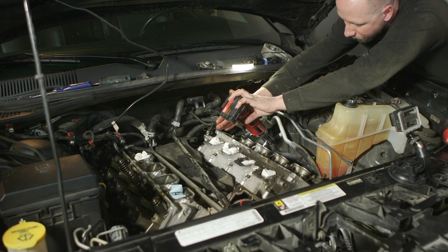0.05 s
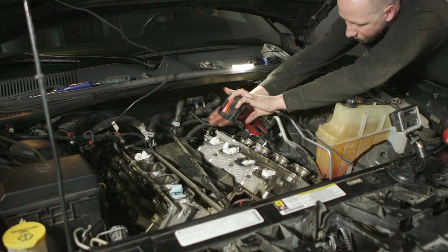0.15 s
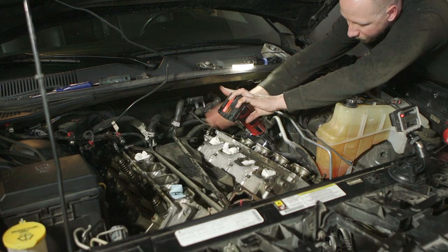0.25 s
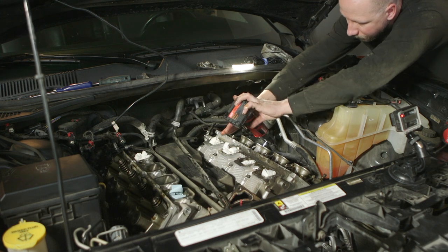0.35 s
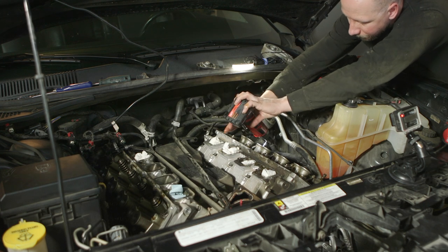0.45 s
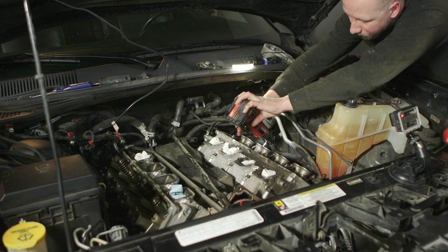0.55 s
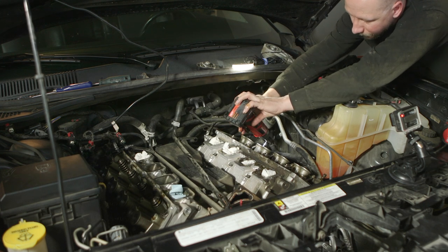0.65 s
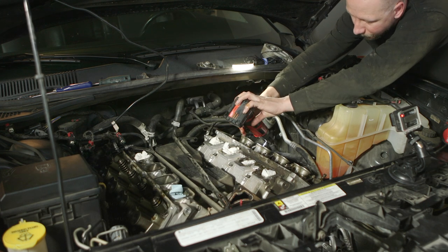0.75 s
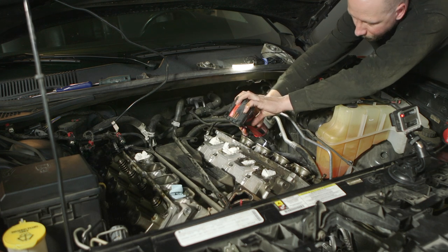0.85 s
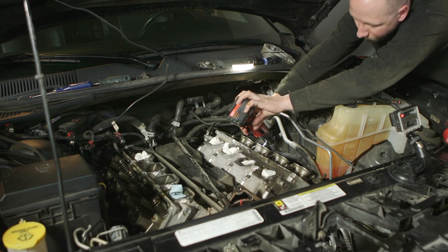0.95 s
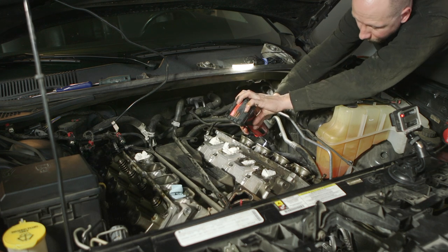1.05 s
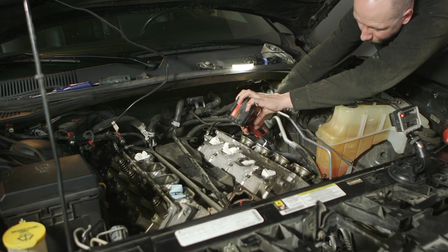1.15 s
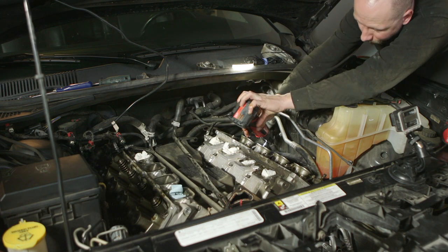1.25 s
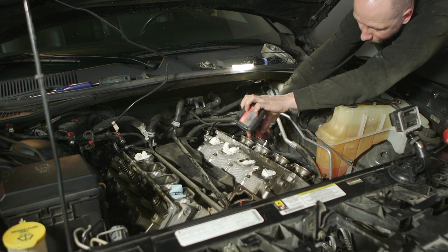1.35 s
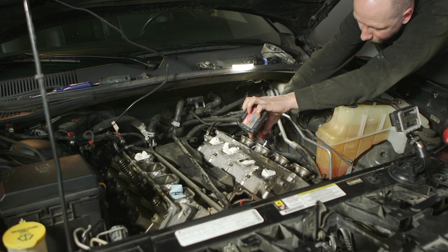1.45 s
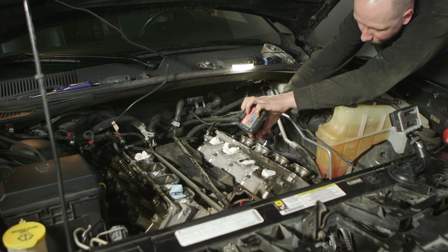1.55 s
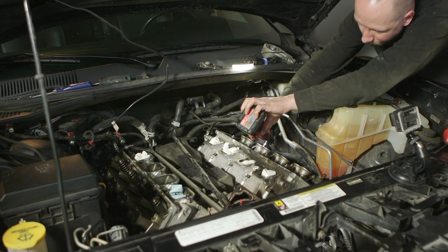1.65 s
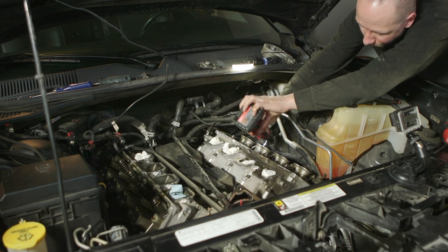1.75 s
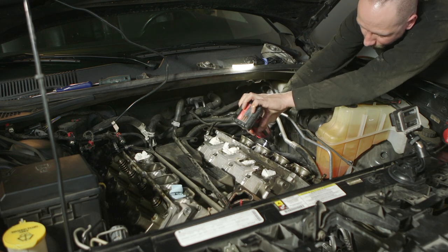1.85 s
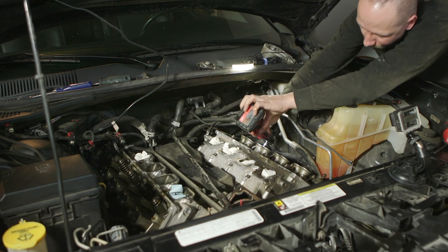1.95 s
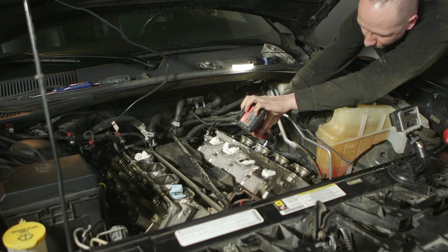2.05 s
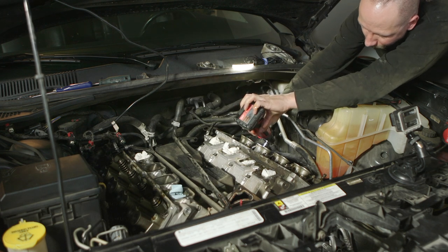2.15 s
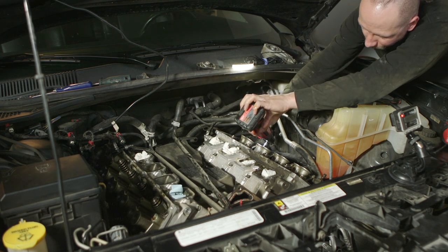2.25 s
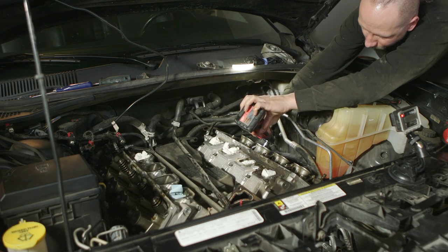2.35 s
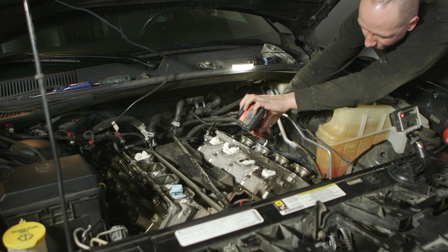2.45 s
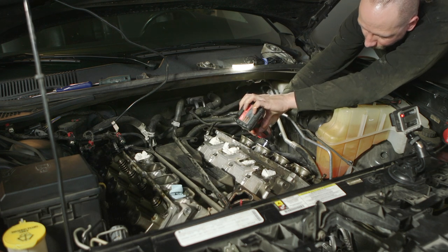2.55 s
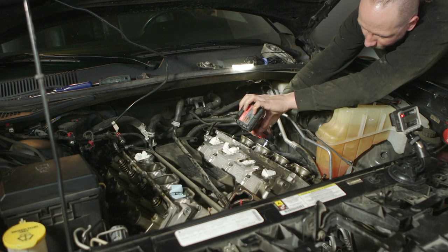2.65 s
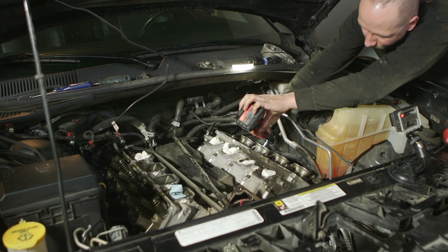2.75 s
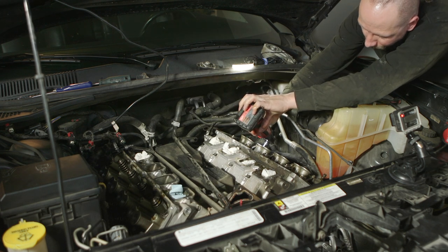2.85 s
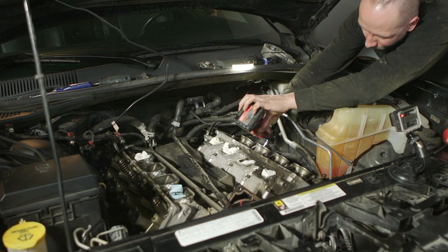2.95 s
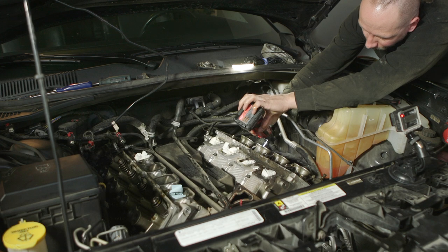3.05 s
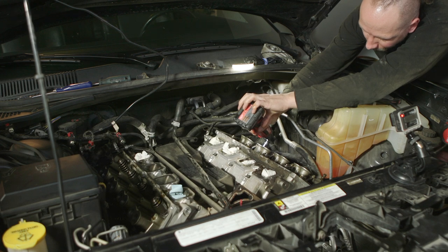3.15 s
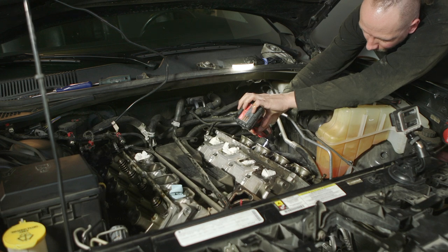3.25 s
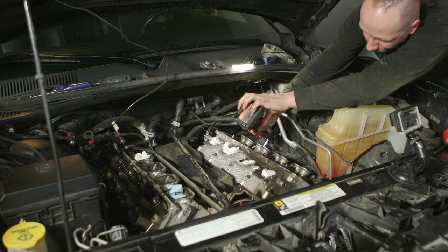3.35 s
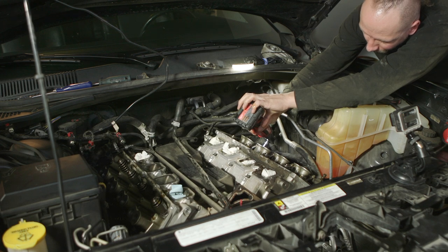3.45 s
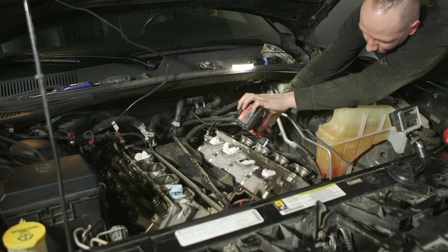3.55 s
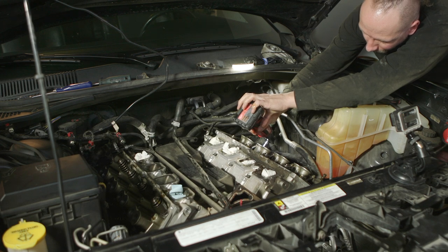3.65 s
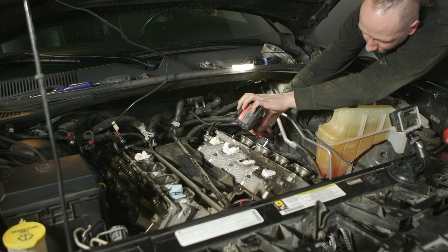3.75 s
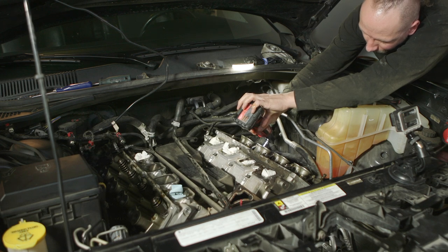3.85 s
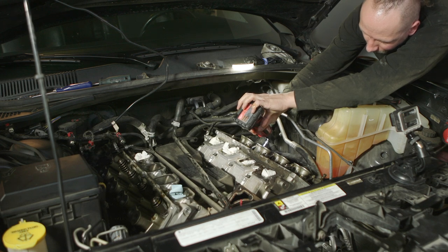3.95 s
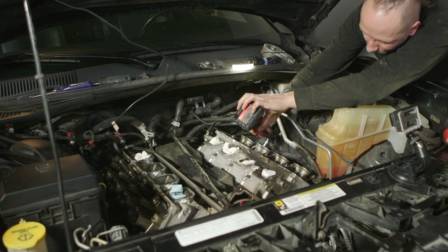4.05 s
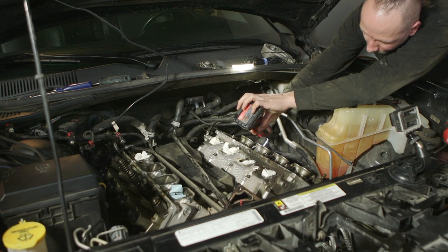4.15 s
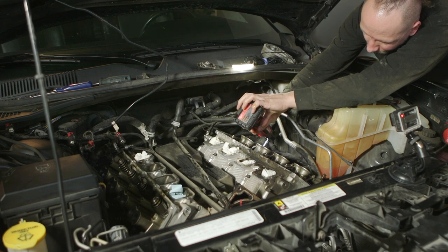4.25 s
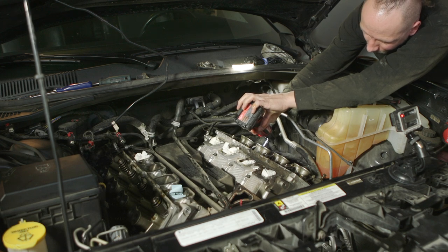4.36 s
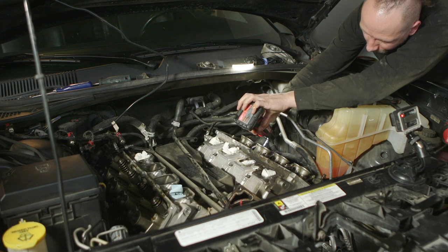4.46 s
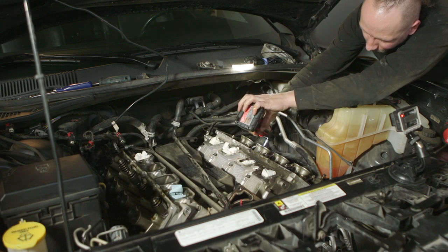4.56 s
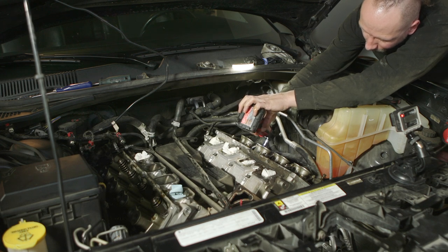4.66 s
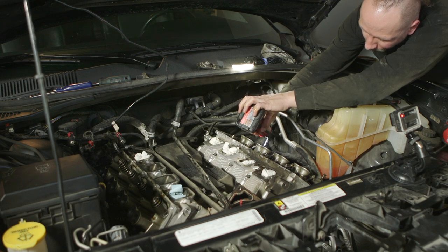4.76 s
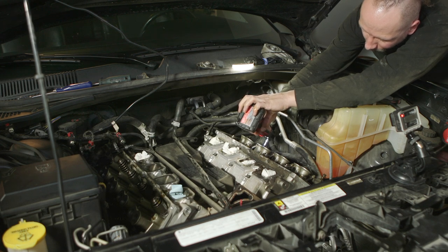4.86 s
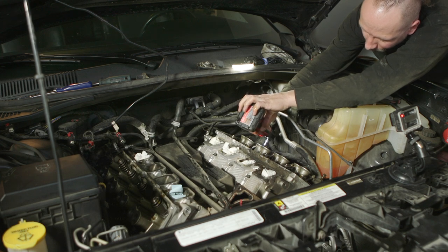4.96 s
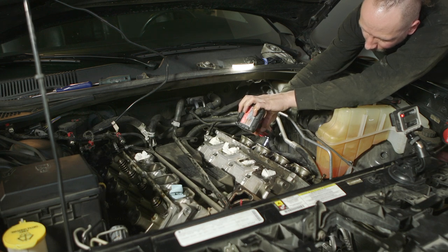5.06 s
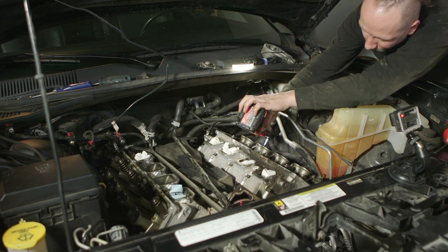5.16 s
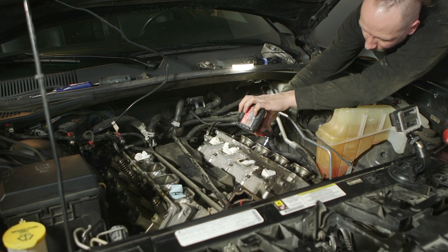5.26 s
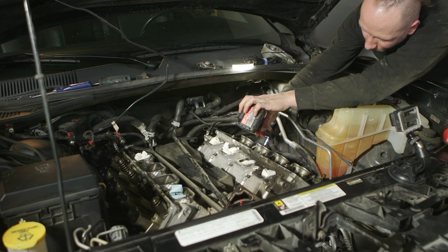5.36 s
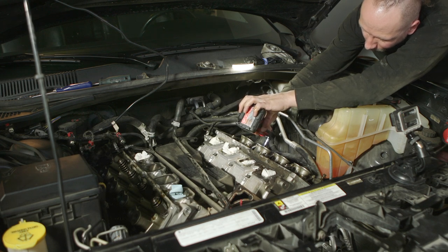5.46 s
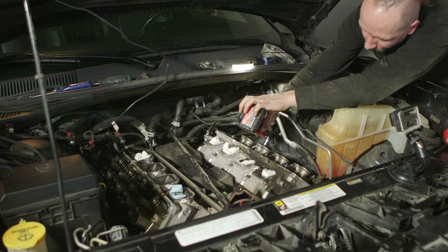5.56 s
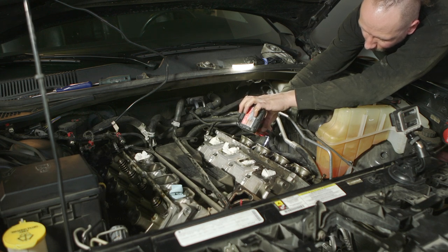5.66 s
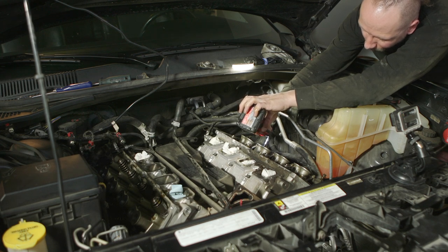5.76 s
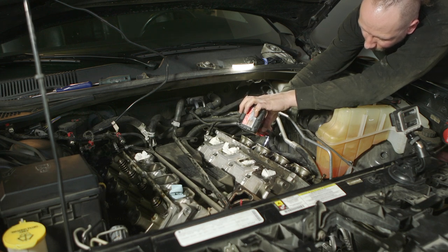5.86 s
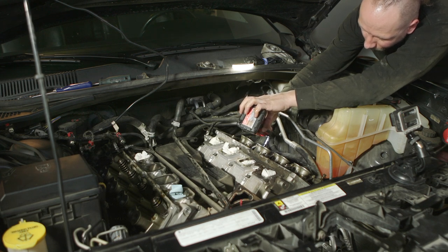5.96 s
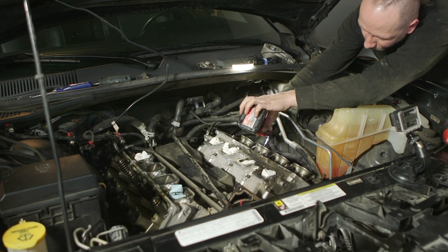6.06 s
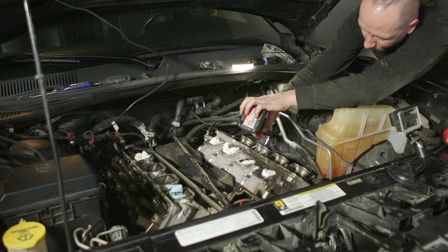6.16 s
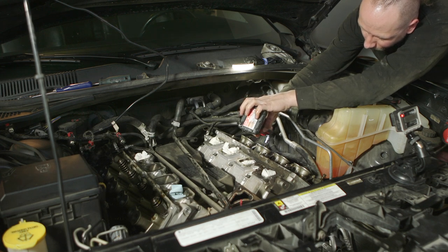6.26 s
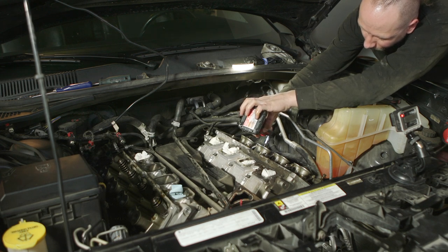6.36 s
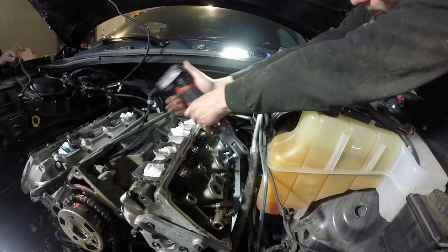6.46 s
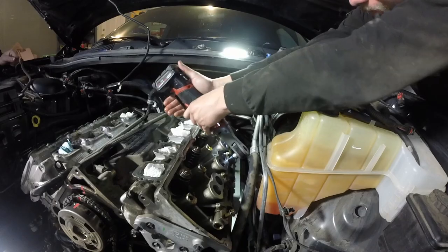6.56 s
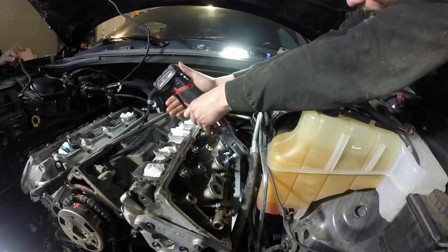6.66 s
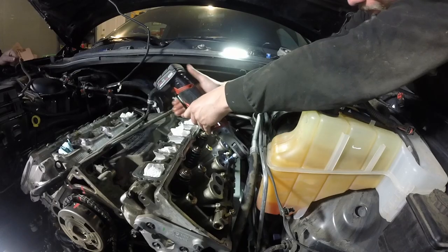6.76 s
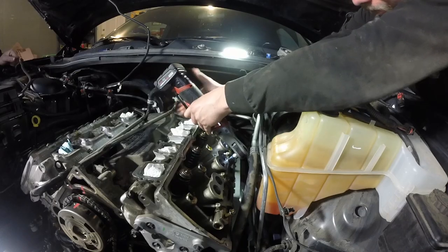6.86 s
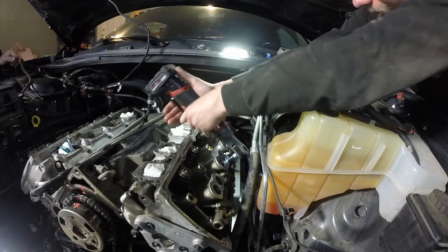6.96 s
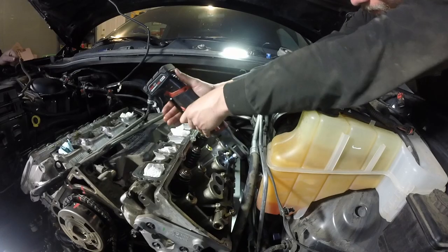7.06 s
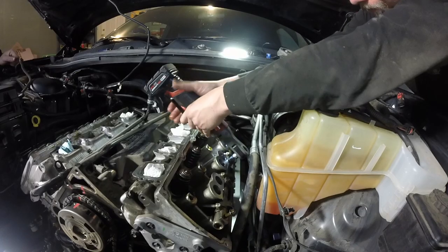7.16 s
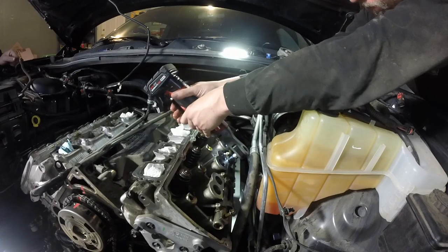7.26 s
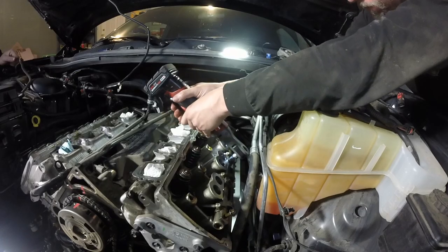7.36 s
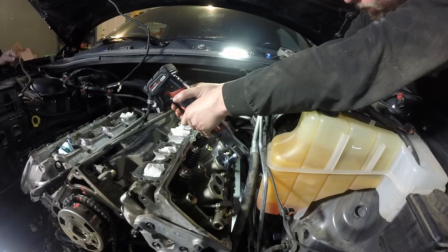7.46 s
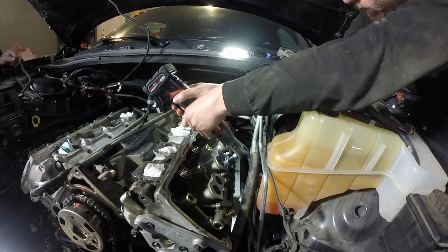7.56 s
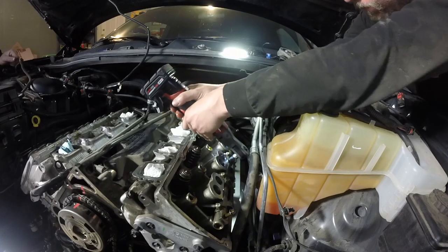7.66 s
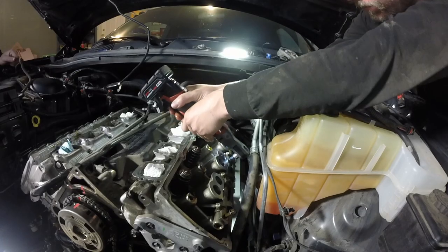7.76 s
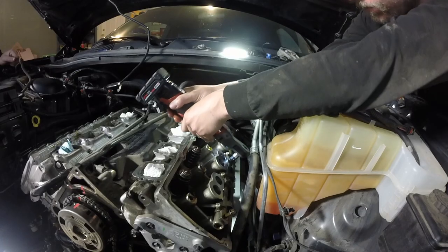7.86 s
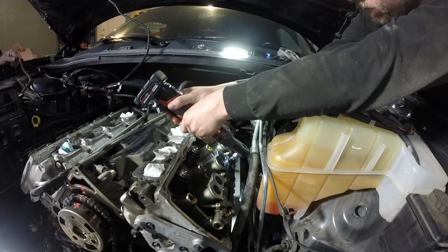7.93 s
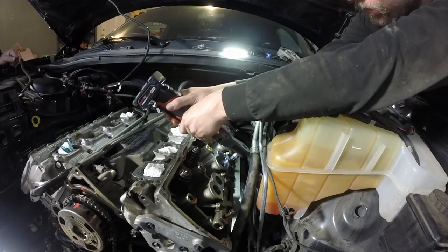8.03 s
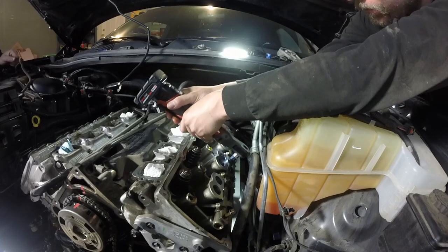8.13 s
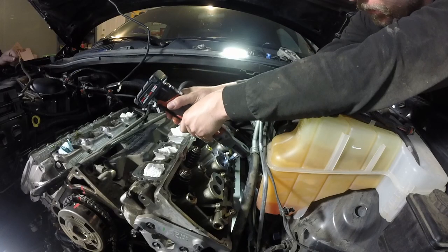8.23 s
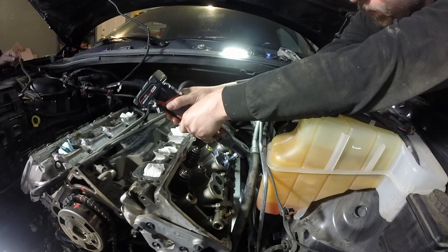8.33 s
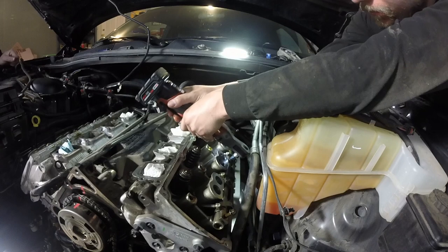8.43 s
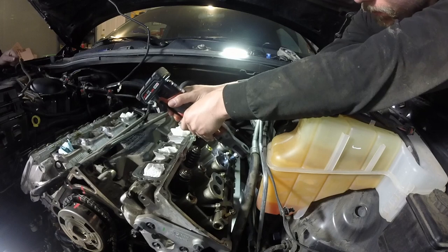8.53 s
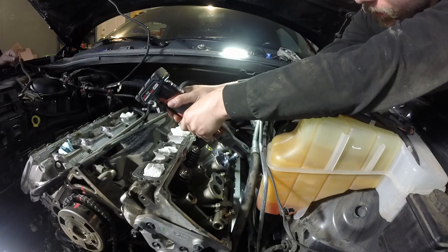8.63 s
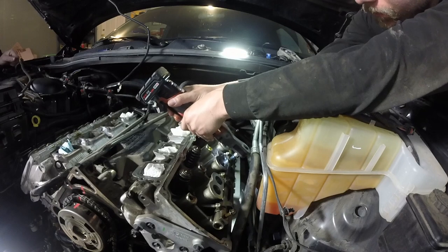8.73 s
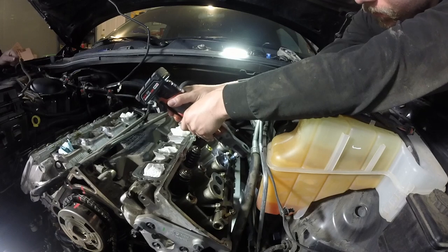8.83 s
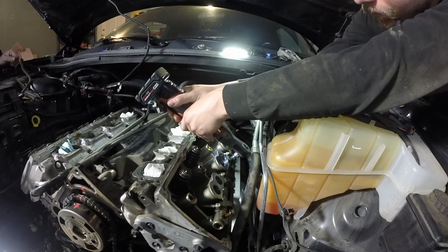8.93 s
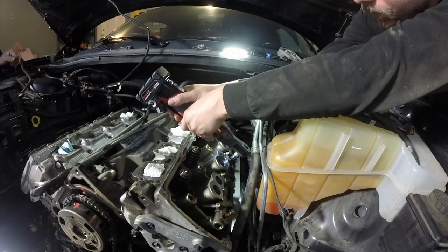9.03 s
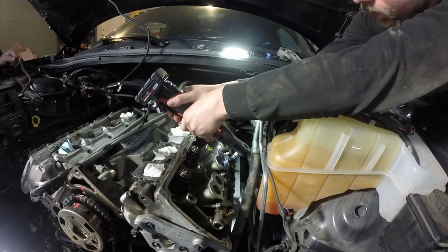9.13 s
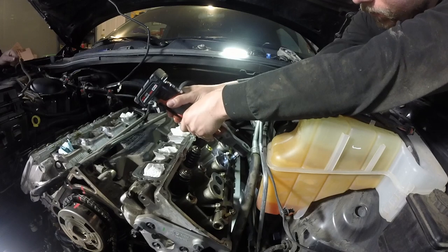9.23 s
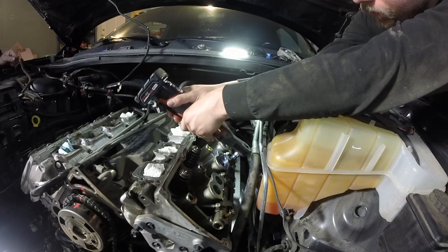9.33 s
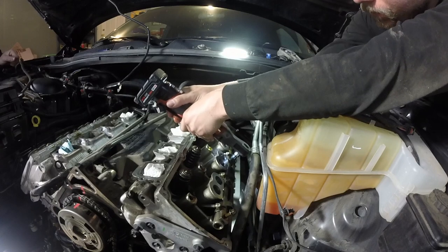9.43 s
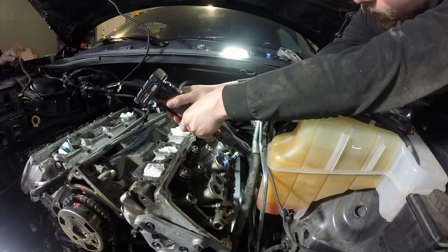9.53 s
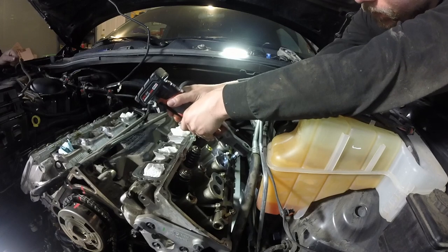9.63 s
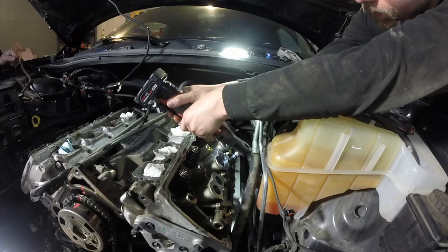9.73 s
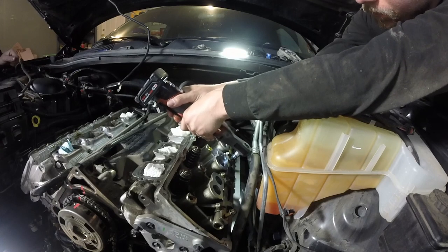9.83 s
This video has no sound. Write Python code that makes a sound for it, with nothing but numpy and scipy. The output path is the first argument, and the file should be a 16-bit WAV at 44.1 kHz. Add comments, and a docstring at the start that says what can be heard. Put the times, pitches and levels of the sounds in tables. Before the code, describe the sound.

Small clicks and a dull plastic bump precede a long electric ratchet run, a dry, bright, rapid steel clatter with a thin motor whine, heard at moderate distance in a lightly reverberant garage. It cuts off quickly. After a sudden change to a near, mono microphone, two steel clacks ring out, then the tool breaks another bolt loose with a thud and whirs strongly, the engine cover thrumming.

```python
"""Cordless ratchet on two engine bolts

A cordless ratchet spins two bolts out of an engine in a garage, with small clicks and two clacks as it is seated.
Motor and pinion whine as summed sines; a crank rocks the pawl about 72 times a second, and its snaps, the gear
knocks and the loose teeth chatter as filtered clicks and noise. The engine cover thrums in tones and rattling
noise when the tool leans on it. The first bolt is heard in stereo, the second closer and in mono."""
import sys
import numpy as np
from scipy import signal
from scipy.fft import rfft, irfft
from scipy.io import wavfile
from scipy.ndimage import uniform_filter1d

SR = 44100
rng = np.random.default_rng(int(sys.argv[2]) if len(sys.argv) > 2 else 0)


def dump(signal):
    """Clip the signal to [-1, 1] and save it as 16-bit WAV at the path in sys.argv[1]."""
    limited = np.clip(np.atleast_2d(signal).T, -1, 1)
    pcm = np.round(limited * 32767).astype(np.int16)
    wavfile.write(sys.argv[1], SR, pcm)


N = 436149
T = np.arange(N) / SR

CUT_S = 6.498  # the first bolt gives way to the second
TOP_HZ = 15900
GARAGE_T60_S = 0.43

# motor turns per crank turn, teeth on the pinion, motor turns per second without load
GEAR_RATIO, PINION_TEETH, FREE_HZ = 7.12, 8, 512
# trigger pulled and let go at each bolt, in seconds
RUN_A, RUN_B = (1.764, 6.225), (7.553, 10.5)
# spin-up time constant, speed the tight thread takes at first, time constant of getting it back
SPIN_UP_S, THREAD_DRAG_HZ, THREAD_FREES_S = 0.018, 70, 0.12
# the motor slows as the trigger is eased, starting this long before it is let go
EASE_S, EASE_HZ_PER_S = 0.085, 680
# the drive starts softly and dies quickly when the trigger is let go
SOFT_START_DB, RELEASE_DB_PER_S = -19, 428
SLACK_S = 0.012  # time for the drive to take up its slack
# the housing rings when the pinion's whine sweeps through it
HOUSING_HZ, HOUSING_WIDTH_HZ, HOUSING_DB = 3730, 220, 3.5
# the socket wobbles once a turn: time of one rub against the bolt, seconds per turn
WOBBLE_A, WOBBLE_B = (2.31, 0.298), (8.0, 0.284)

# The socket drops on to the bolt head.
# Each row: start in seconds, level in dB, ring t60 in seconds, treble tilt in dB per decade.
CLACK_HITS = [(6.5003, -26, 0.1, -3), (6.964, -30, 0.11, -3.5)]


def undb(db):
    """Decibels to gain."""
    return 10 ** (np.asarray(db) / 20)


def unit(x):
    """Scale to rms 1."""
    return x / np.sqrt(np.mean(x ** 2))


def walk(rate):
    """Random levels held 1 / rate s and slewed twice; spread near 1."""
    k = int(SR / rate)
    steps = np.repeat(rng.standard_normal(N // k + 1), k)
    return 1.3 * uniform_filter1d(uniform_filter1d(steps, k), k)[:N]


def swell(at_s, half_s):
    """A smooth rise and fall around a moment, 1 at its top."""
    return np.exp(-np.minimum(np.abs(T - at_s) / half_s, 4) ** 3)


def colour(x, points, size=4096):
    """Causal minimum-phase filter through (Hz, dB) points."""
    hz, db = np.transpose(points)
    bins_hz = np.arange(size // 2 + 1) * SR / size
    gain = undb(np.interp(np.log(bins_hz + 1), np.log(hz), db))
    # folding the cepstrum on to positive time makes the filter causal
    cepstrum = irfft(np.log(gain))
    cepstrum[1:size // 2] *= 2
    cepstrum[size // 2 + 1:] = 0
    return signal.oaconvolve(x, irfft(np.exp(rfft(cepstrum))))[:N]


def resonance(x, hz, width):
    """One band-pass resonance, gain 1 at the centre."""
    return signal.lfilter(*signal.iirpeak(hz, hz / width, fs=SR), x)


def ring(t60):
    """Response of countless modes: decaying noise of energy 1."""
    t = T[:int(.7 * SR)]
    h = rng.standard_normal(len(t)) * np.exp(-np.log(1000) * t / t60)
    return h / np.sqrt(np.sum(h ** 2))


def echo(x, t60):
    """Dense reflections of a sound."""
    return signal.oaconvolve(x, ring(t60))[:N]


def strikes(turns, scatter_db, slop_s):
    """One click at each whole turn, uneven in strength and timing."""
    at = np.flatnonzero(np.diff(np.floor(turns)) > 0)
    chance = rng.standard_normal((len(at), 2))
    late = (slop_s * SR * chance[:, 0]).astype(int)
    out = np.zeros(N)
    out[np.clip(at + late, 0, N - 1)] = undb(scatter_db * chance[:, 1])
    return out / np.sqrt(np.mean(out[at[0]:at[-1]] ** 2))


def tone(turns, flutter_db):
    """A rotating part's tone of rms near 1, fluttering in strength."""
    return np.sqrt(2) * np.sin(2 * np.pi * (turns + rng.random())) * undb(flutter_db * walk(24))


def air(spectrum, db):
    """Quiet background: coloured noise that swells a little."""
    return undb(db + 0.46 * walk(3.6)) * unit(colour(rng.standard_normal(N), spectrum))


def garage(x):
    """Diffuse tail of the room, which swallows the highest treble."""
    return colour(echo(x, GARAGE_T60_S), [(1000, 2.5), (6500, -0.5), (15000, -12.0)])


def hits(rows, spectrum, tail_db, tail_t60):
    """Short metal contacts, each with its own damping and brightness, and the garage's diffuse tail after them."""
    out = np.zeros(N)
    for s, db, t60, treble_db in rows:
        age = np.clip(T - s, 0, 2)
        tilted = [(hz, d + treble_db * np.log10(hz)) for hz, d in spectrum]
        grain = unit(colour(rng.standard_normal(N), tilted))
        decay = undb(-60 * age / t60) + undb(tail_db - 60 * age / tail_t60)
        out += undb(db) * grain * (T >= s) * decay
    return out


def bump(at_s, bump_db, t60):
    """The plastic grip bumps the engine: a dull, hollow knock of three body resonances."""
    noise = colour(rng.standard_normal(N), [(3500, 0), (8000, -21)])
    body = resonance(noise, 930, 220) + .5 * resonance(noise, 2660, 200) + 1.1 * resonance(noise, 440, 150)
    decay = np.exp(-np.log(1000) * np.clip(T - at_s, 0, 1) / t60)
    return undb(bump_db) * unit(body) * (T >= at_s) * decay


def socket_ring(ring_db, t60):
    """After each clack the steel socket and its extension ring on briefly."""
    noise = rng.standard_normal(N)
    steel = unit(resonance(noise, 3350, 89) + 0.93 * resonance(noise, 800, 50))
    blows = 0
    for s, db, _, _ in CLACK_HITS:
        blows = blows + undb(db) * (T >= s) * np.exp(-np.log(1000) * np.clip(T - s, 0, 2) / t60)
    return undb(ring_db) * steel * blows


def trigger(start, whistle_db, length_s=0.045):
    """The speed controller whistles upward as the motor starts."""
    age = np.clip((T - start) / length_s, 0, 1)
    return undb(whistle_db) * np.sin(np.pi * age) * tone(np.cumsum(9800 + 800 * age) / SR, 2)


def recoil(at_s, length_s, thud_db):
    """The tight bolt kicks the tool and the engine back: a dull thud."""
    thud = unit(colour(rng.standard_normal(N), [(20, -2), (45, -7), (80, -8.0), (200, -17), (1000, -75)]))
    return undb(thud_db) * thud * np.exp(-np.minimum(np.abs(T - at_s) / length_s, 10) ** 2)


def shaft(run, wander):
    """Motor turns so far, and the load that shows as lost speed."""
    # The thread binds briefly. Each row: time in seconds, lost speed in Hz, half length in seconds.
    snags = [(4.688, 80, 0.04), (7.71, 22, 0.085)]
    age = np.maximum(T - run[0], 0)
    drag = THREAD_DRAG_HZ * np.exp(-age / THREAD_FREES_S)
    drag = drag + sum(hz * np.exp(-((T - s) / half_s) ** 2) for s, hz, half_s in snags)
    eased = EASE_HZ_PER_S * np.clip(T - run[1] + EASE_S, 0, .5)
    hz = (FREE_HZ - drag - eased) * (1 - np.exp(-age / SPIN_UP_S))
    turns = np.cumsum(hz * (1 + wander * walk(30))) / SR
    return turns, np.clip(1 - hz / FREE_HZ, 0, .2)


def effort(run, run_db, attack_s, tight_db, tight_s, loosen_db_per_s):
    """Strength of the drive: it rises, works harder while the bolt is tight, rattles more as it loosens, and stops."""
    age = np.maximum(T - run[0], 0)
    attack = SOFT_START_DB * np.maximum(1 - age / attack_s, 0)
    hold = run_db + tight_db * np.exp(-age / tight_s) + loosen_db_per_s * age
    release = RELEASE_DB_PER_S * np.clip(T - run[1], 0, .5)
    return undb(attack + hold - release) * np.minimum(age / SLACK_S, 1)


def wobble(timing, rub_s):
    """1 each time the turning socket rubs the bolt, near 0 between."""
    at_s, turn_s = timing
    away = ((T - at_s) / turn_s + .5) % 1 - .5
    return np.exp(-.5 * (away * turn_s / rub_s) ** 2)


def cover(turns, rub, axis, buzz_db, thrum_db, rattle_db, lift_db):
    """The engine cover buzzes with the crank and thrums at two strokes a turn; each socket rub shifts the thrum level."""
    # Each row: multiple of the crank speed, relative dB at the first bolt, relative dB at the second.
    buzz_tones = [(1, 0, -5.5), (3, -7, 3), (4, -4, -0.5), (5, 1.5, 2)]
    # The tool leans on the cover. Each row: time in seconds, half length in seconds,
    # buzz in dB, thrum in dB (both before the trims passed in).
    leans = [(2.05, 0.25, -69, -62.5), (4.147, 0.08, -51.5, -36.5), (4.43, 0.21, -49.5, -47),
             (8.33, 0.51, -54.5, -36), (9.298, 0.54, -42.5, -27), (9.853, 0.35, -44, -47)]
    crank = turns / GEAR_RATIO
    buzz = sum(undb(row[axis]) * tone(row[0] * crank + 0.061 * walk(22), 2.0) for row in buzz_tones)
    rattle_colour = [(90, -21), (170, -5.5), (250, -10.0), (380, -4.5), (800, -20), (1400, -4.5), (2500, -40.5)]
    rattle = unit(colour(rng.standard_normal(N), rattle_colour))
    buzzing = sum(undb(db) * swell(s, half_s) for s, half_s, db, _ in leans)
    thrumming = sum(undb(db) * swell(s, half_s) for s, half_s, _, db in leans)
    thrum = thrumming * undb(lift_db * rub) * tone(2 * crank + 0.19 * walk(23), 0.89)
    return buzzing * (undb(buzz_db) * buzz + undb(rattle_db) * rattle) + undb(thrum_db) * thrum


def socket(turns, rub, sizzle_db, upper_db, between=0.16, uneven_db=1.0):
    """The thin socket wall rings high each time its wobble brings it against the bolt."""
    contact = (between + rub) * undb(uneven_db * walk(4))
    stroke = 0.3 + np.exp(-(turns / GEAR_RATIO % 1) / 0.27)
    scrape = rng.standard_normal(N) * stroke * undb(3.5 * walk(70))
    lower = unit(resonance(resonance(scrape, 10380, 750), 10000, 2300))
    upper = unit(resonance(resonance(scrape, 13850, 400), 13850, 600))
    return undb(sizzle_db) * contact * (lower + undb(upper_db) * upper)


def pinion(turns, load, drive, free_db, loaded_db, waver_db, sideband):
    """Tooth-mesh whine: load alters it, side pressure adds to it, near a stall it fades; the crank gives sidebands."""
    # Side pressure makes the pinion sing. Each row: time in seconds, half length in seconds,
    # level in dB before the housing's resonance.
    presses = [(1.99, 0.079, -41), (2.237, 0.12, -32.5), (7.798, 0.045, -25), (8.338, 0.02, -28.5),
               (8.697, 0.15, -30.5), (9.556, 0.036, -33), (9.83, 0.1, -31)]
    stroke = 1 + sideband * np.cos(2 * np.pi * turns / GEAR_RATIO)
    running = drive * undb(free_db + loaded_db * np.minimum(load / .05, 1) + waver_db * walk(12))
    pressed = sum(undb(db) * swell(s, half_s) for s, half_s, db in presses)
    meshing = np.interp(load, [.11, .14], [1, 0])
    whine = (running + pressed) * meshing * stroke * tone(PINION_TEETH * turns + .05 * walk(90), 2.0)
    return whine + undb(HOUSING_DB) * resonance(whine, HOUSING_HZ, HOUSING_WIDTH_HZ)


def hum(turns, load, axis):
    """Clean tones of the motor shaft and of the crank; they fade as the motor slows."""
    # Each row: multiple of the motor speed, dB against the chatter on the first bolt, dB on the second.
    motor_tones = [(1, -18, -19), (2, -22, -13), (4, -23, -19), (11, -25, -26), (13, -32, -28),
                   (16, -34, -30)]
    # Each row: multiple of the crank speed, dB against the chatter on the first bolt, dB on the second.
    crank_tones = [(2, -42, -42), (3, -41, -35), (4, -42, -33), (5, -33, -24), (6, -29, -32), (7, -31, -23),
                   (8, -36, -24), (9, -34, -31), (10, -35, -31), (11, -36, -21), (17, -37, -24)]
    motor = sum(undb(row[axis]) * tone(row[0] * turns, 1 + np.log10(row[0]) * 2) for row in motor_tones)
    crank = sum(undb(row[axis]) * tone(row[0] * turns / GEAR_RATIO, 3.1) for row in crank_tones)
    return motor * (1 - load) ** 12 + crank * (1 - load) ** 3


def chatter(turns, load, spectrum, pawl_db, load_db, gear_db, throb, housing_t60):
    """The pawl snaps on each stroke, harder under load; gears knock each motor turn; loose teeth rattle after the snap."""
    crank = turns / GEAR_RATIO
    # two strokes a crank turn, the return stroke a little weaker
    pawl = strikes(crank, 2.5, .00014) + .8 * strikes(crank + .5, 3, .00018)
    gears = strikes(turns, 4, .0004)
    grit = rng.standard_normal(N) * undb(2.85 * rng.standard_normal(N))
    teeth = unit(grit * (1 + throb * np.exp(-(crank % 1) / 0.48)))
    blows = undb(pawl_db + load_db * load) * pawl + undb(gear_db) * gears
    steel = teeth * undb(0.83 * walk(25)) + echo(blows, housing_t60)
    sound = colour(steel, spectrum)
    return sound / np.std(sound[load < .02])  # level 1 while running freely


def first_bolt():
    """Taps, then a long run with one brief snag, heard across the engine bay in stereo."""
    # Chatter colour. Each row: frequency in Hz, gain in dB.
    chatter_colour = [(60, -35), (270, -28.5), (420, -15), (1250, -4.5), (1550, -1), (1800, -4.5),
                      (3000, -1.5), (4300, 2), (4950, 1), (6300, 1), (7700, -7), (9000, -5.5),
                      (10400, -4.5), (13000, -13), (15500, -19.5)]
    # Light taps of socket and fingers. Each row: start in seconds, level in dB, ring t60 in seconds,
    # treble tilt in dB per decade.
    tap_rows = [(0.003, -60.5, 0.38, -1), (0.319, -49, .02, 0), (0.3267, -42.5, .025, 7),
                (0.358, -55, .03, 0), (0.53, -73, .1, 5), (0.708, -67, 0.076, 8), (0.994, -60, 0.017, 26),
                (1.724, -54, 0.027, -5)]
    # Tap colour. Each row: frequency in Hz, gain in dB.
    tap_colour = [(100, -12), (400, 0.5), (800, -11), (1500, -3), (2100, -5.5), (3000, -3), (5000, -9),
                  (9000, -22), (15000, -32.5)]
    # Garage air. Each row: frequency in Hz, relative level in dB.
    air_colour = [(15, -50), (25, -28), (49, -9.5), (69, -9), (125, -10), (158, -13), (186, -14),
                  (243, -20.5), (293, -16.5), (15000, -50)]
    # Stereo width, a filter on the side signal. Each row: frequency in Hz, gain in dB.
    side_colour = [(60, -19), (110, -23), (200, -9.5), (380, -9), (700, -12.5), (1290, -10.5), (2380, -6.5),
                   (4400, -3), (8120, -2), (15000, -0.5)]
    air_db = -66

    turns, load = shaft(RUN_A, wander=.002)
    drive = effort(RUN_A, run_db=-26.5, attack_s=0.062, tight_db=4.5, tight_s=0.21, loosen_db_per_s=0.2135)
    rub = wobble(WOBBLE_A, rub_s=0.064)
    noise = drive * chatter(turns, load, chatter_colour, pawl_db=-9.5, load_db=1, gear_db=-6.5,
                            throb=0.3, housing_t60=0.029)
    noise += drive * socket(turns, rub, sizzle_db=-6.5, upper_db=-14)
    noise += trigger(1.757, -55)
    whine = pinion(turns, load, drive, free_db=-22, loaded_db=7.5, waver_db=2, sideband=0.17)
    taps = hits(tap_rows, tap_colour, tail_db=-17.0, tail_t60=0.55)
    taps += bump(1.536, -56, .14)
    engine = cover(turns, rub, axis=1, buzz_db=-1.5, thrum_db=-1.5, rattle_db=5.5, lift_db=0.5)
    near = noise + whine + taps + drive * hum(turns, load, axis=1) + engine
    mid = near + undb(-7.5) * garage(noise + whine) + air(air_colour, air_db)
    # the two capsules differ by the reflections that reach them, and by their air
    reflections = undb(-3.5) * echo(noise + whine + taps, .06) + undb(-4.0) * garage(noise + whine + taps)
    side = colour(reflections + air(air_colour, air_db), side_colour)
    return np.array([undb(.25) * (mid + side), undb(-.25) * (mid - side)])


def second_bolt():
    """Two clacks, then the bolt breaks loose with hard knocks and runs free, close by."""
    # Chatter colour. Each row: frequency in Hz, gain in dB.
    chatter_colour = [(60, -18), (260, -17), (500, -8.5), (730, -7.5), (810, -0.5), (1350, 0), (1650, -3.5),
                      (3000, -3), (4600, -1), (6800, -2.5), (7600, -11), (8600, -6), (12800, -22.5),
                      (15500, -33.5)]
    # Clack colour. Each row: frequency in Hz, gain in dB.
    clack_colour = [(60, -7), (200, 3), (320, -12), (430, 5.5), (520, -10), (720, 1.5), (1100, -4),
                    (1500, -4), (2400, -4.5), (3350, -2), (4500, -6.5), (7000, -13.5), (9000, -17),
                    (15000, -40)]
    # Garage air. Each row: frequency in Hz, relative level in dB.
    air_colour = [(15, -26), (25, 2), (45, -1), (146, -8), (191, -11), (335, -14), (558, -18), (1030, -19),
                  (1720, -24.5), (6720, -34), (12500, -47), (15000, -53)]

    turns, load = shaft(RUN_B, wander=.0015)
    drive = effort(RUN_B, run_db=-17.5, attack_s=0.07, tight_db=2.0, tight_s=0.14, loosen_db_per_s=0.14)
    rub = wobble(WOBBLE_B, rub_s=0.044)
    noise = drive * chatter(turns, load, chatter_colour, pawl_db=-13, load_db=42, gear_db=-10,
                            throb=.2, housing_t60=.03)
    # while the bolt is tight, each stroke also rings the casting
    blows = echo(strikes(turns / GEAR_RATIO, 2, .0003), .03)
    knocks = resonance(resonance(blows, 830, 110), 830, 200)
    noise += undb(-13) * drive * unit(knocks) * swell(7.69, .085)
    noise += drive * socket(turns, rub, sizzle_db=-14, upper_db=-32)
    noise += trigger(7.545, -61)
    whine = pinion(turns, load, drive, free_db=-9.3, loaded_db=-8, waver_db=1.5, sideband=0.3)
    engine = cover(turns, rub, axis=2, buzz_db=1.0, thrum_db=-0.5, rattle_db=7.5, lift_db=-9.5)
    engine += recoil(7.64, 0.057, -35)
    clacks = hits(CLACK_HITS, clack_colour, tail_db=-12, tail_t60=0.48) + socket_ring(-12, 0.3)
    near = noise + whine + engine + drive * hum(turns, load, axis=2) + clacks
    return near + undb(-7) * garage(noise + 0.45 * whine) + air(air_colour, -53.5)


def scene():
    """The listening position changes between the two bolts, with a very short crossfade."""
    closer = uniform_filter1d(1. * (T > CUT_S), size=64)
    return (1 - closer) * first_bolt() + closer * second_bolt()


def record(dry):
    """The recorder cuts the top with a steep low-pass."""
    return signal.sosfilt(signal.ellip(10, .2, 80, TOP_HZ, fs=SR, output="sos"), dry)


dry = scene()
out = record(dry)
dump(out)
```